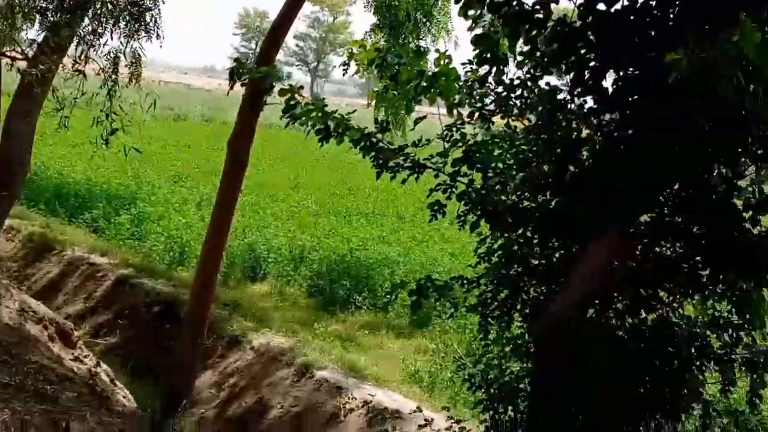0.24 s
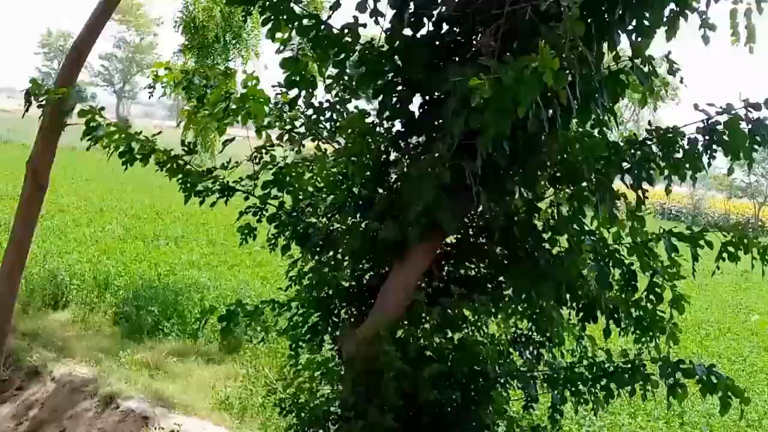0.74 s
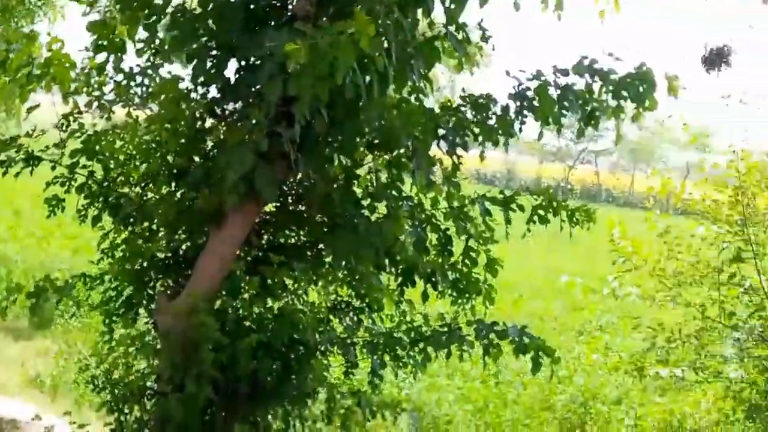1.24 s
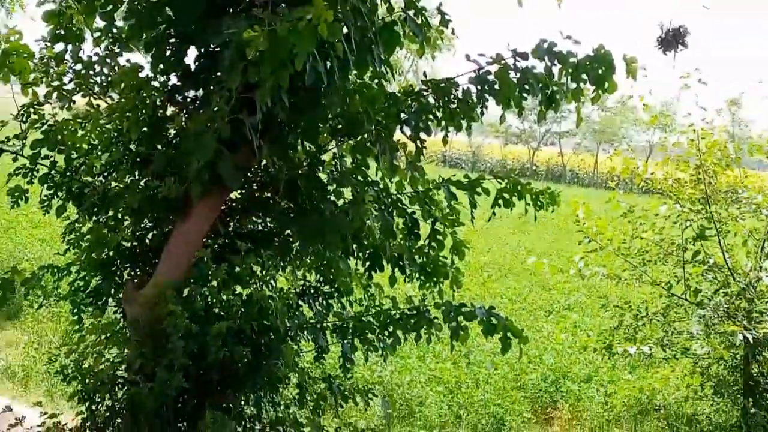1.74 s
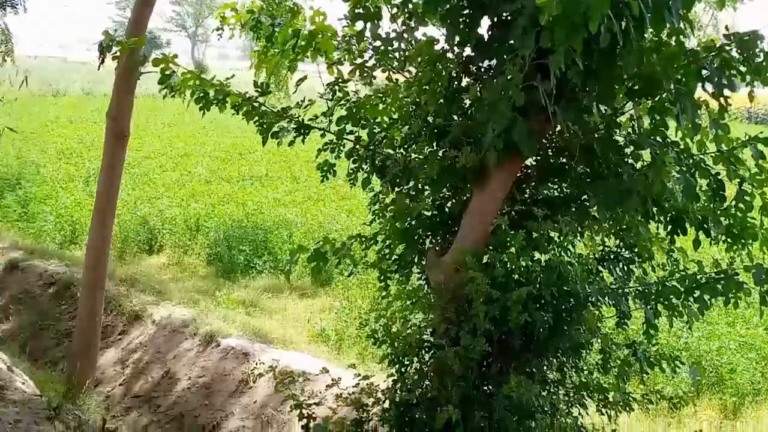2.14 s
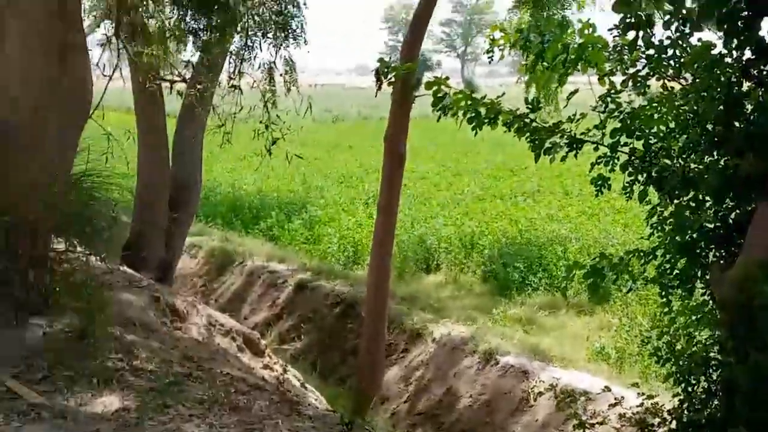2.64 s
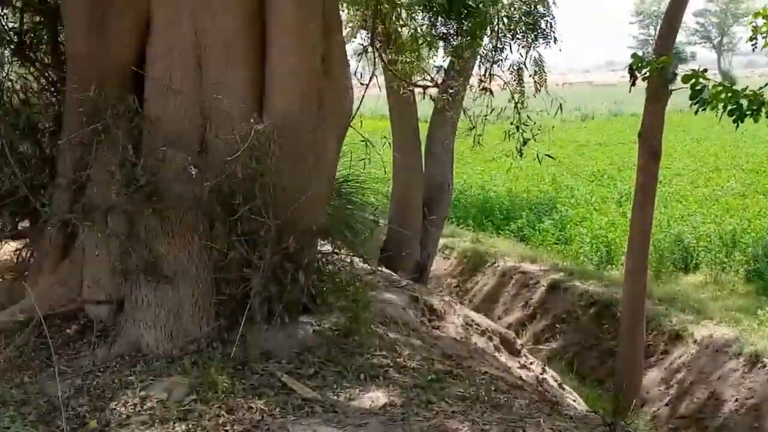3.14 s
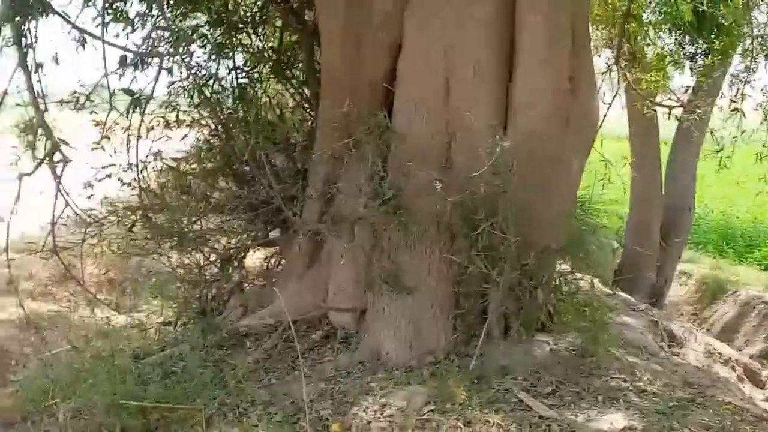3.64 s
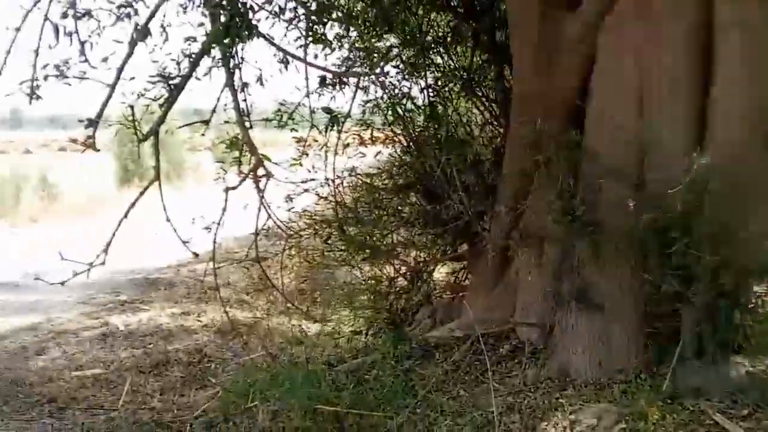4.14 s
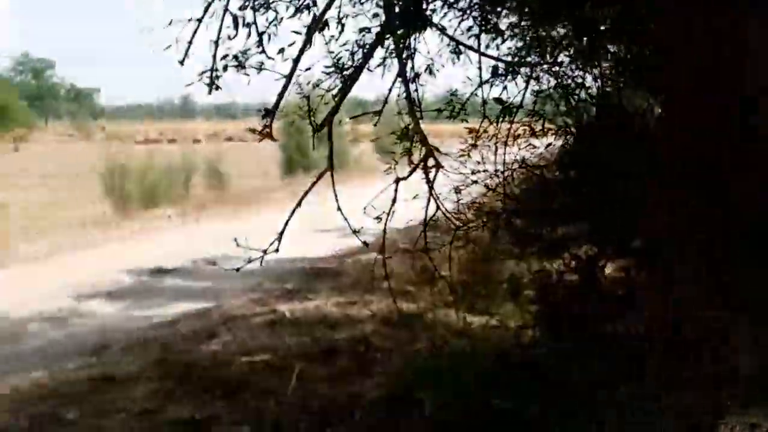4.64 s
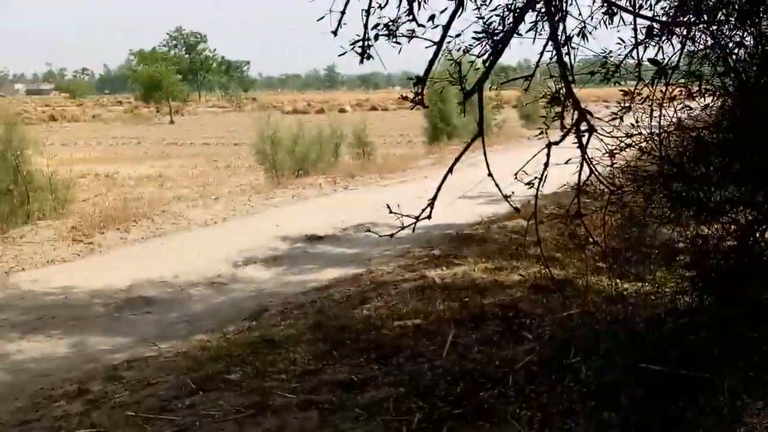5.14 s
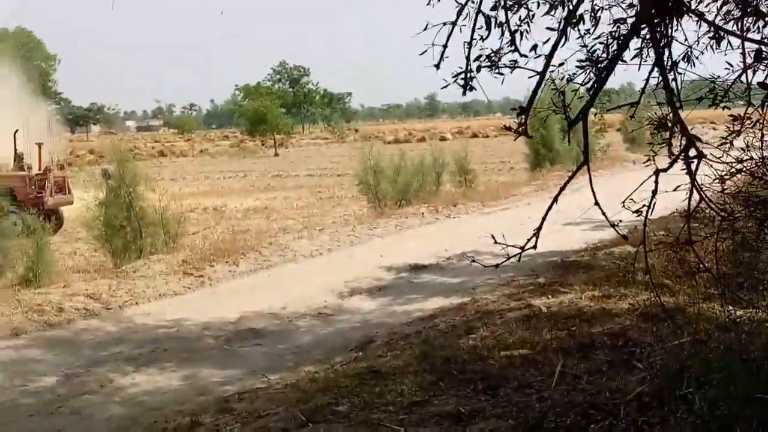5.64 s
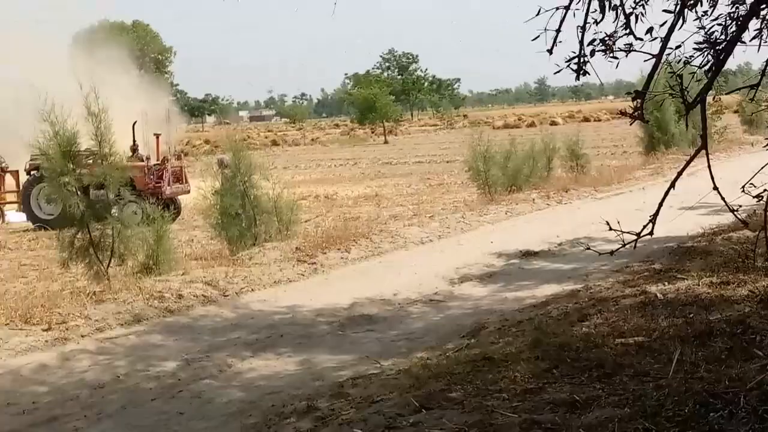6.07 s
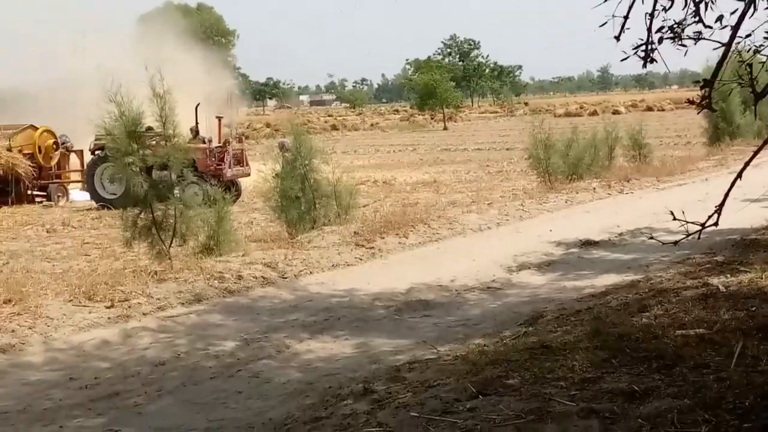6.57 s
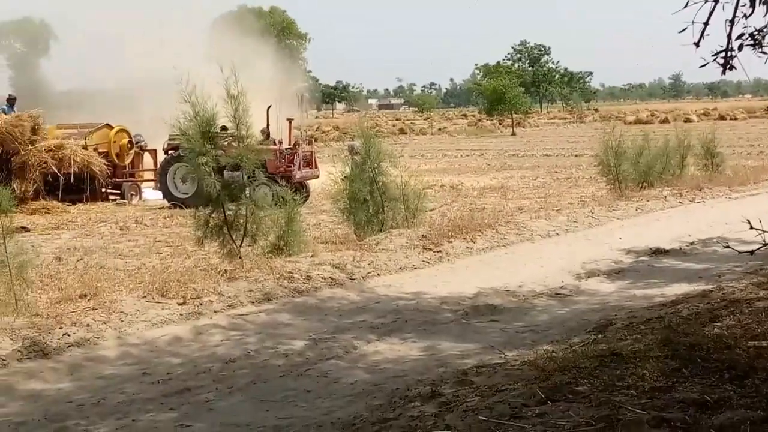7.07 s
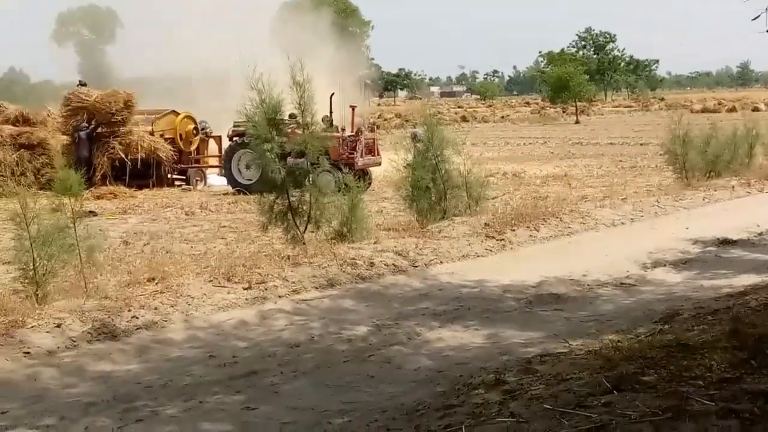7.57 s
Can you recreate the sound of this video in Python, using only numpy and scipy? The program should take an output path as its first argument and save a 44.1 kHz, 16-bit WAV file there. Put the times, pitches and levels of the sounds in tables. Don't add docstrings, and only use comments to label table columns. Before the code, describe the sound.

A tractor diesel drones steadily across an open field, knocking fast through the dry rushing hiss of a thresher, with small birds chirping early on.

```python
import sys
import numpy as np
from scipy import signal
from scipy.fft import rfft, irfft, next_fast_len
from scipy.io import wavfile
from scipy.ndimage import uniform_filter1d

SR = 44100
rng = np.random.default_rng(int(sys.argv[2]) if len(sys.argv) > 2 else 0)


def to_linear_factor(level_db):
    exponent = np.asarray(level_db, float) / 20
    return 10 ** exponent


def transcribe(signal):
    frames = np.atleast_2d(signal).T
    limited = np.clip(frames, -1, 1)
    pcm = np.round(limited * 32767).astype(np.int16)
    wavfile.write(sys.argv[1], SR, pcm)


N = 344421

# time_s, firing_hz
ENGINE_SPEED = [(0.0, 41.97), (0.77, 42.35), (1.57, 42.09), (1.71, 42.28), (1.93, 43.26), (2.43, 43.67),
                (2.64, 44.05), (3.32, 44.62), (3.78, 44.02), (4.18, 43.81), (4.52, 43.98), (5.73, 43.22),
                (6.69, 43.97), (6.9, 44.03), (7.2, 44.56), (7.5, 44.71), (7.81, 44.38)]
FREE_HZ, LOADED_HZ = 44.5, 42.2
# multiple of its rate, level_db running free, gain_db under full load
EXHAUST_TONES = [(1, -55.5, -1.5), (2, -36, -0.5), (3, -40, 5), (4, -58.5, 17), (5, -48.5, -9)]
BLOWER_TONES = [(2, -44.5, 6), (3, -48, 3.5), (4, -63, 12), (6, -47, -1.5)]
DRUM_TONES = [(1, -50.5, 4.5), (2, -44.5, -3), (3, -61, 5.5)]
GEAR_TONES = [(7, -59.5, -2.5), (17, -47, -4.5), (26, -60.5, 16.5), (42, -64, 9.5), (69.8, -66.5, 12),
              (78, -70.5, 12.5)]
PULLEY_TONES = [(1, -62, 14)]
# frequency_hz, level_db (per Hz)
RUMBLE_SPECTRUM = [(18, -46.5), (30, -19), (65, -9), (114, -2.5), (146, -3), (183, -8.5), (254, -5),
                   (352, -9.5), (417, -13), (563, -17), (707, -30.5), (803, -23.5), (900, -28.5),
                   (1170, -50.5), (1980, -120)]
# frequency_hz, level_db (per Hz)
RUSH_SPECTRUM = [(350, -25), (560, -8), (710, -17), (990, -9), (1250, -11), (1950, -6), (2350, .1),
                 (2750, -.1), (3200, -6), (4500, -7), (6200, -12), (7400, -21.5), (8300, -27), (10200, -36)]
# frequency_hz, side_minus_mid_db
STEREO_WIDTH = [(60, -17), (100, -38.5), (180, -48), (310, -32.5), (530, -15), (920, -14), (1600, -17.5),
                (2760, -18.5), (4760, -20), (8230, -2.5)]
# time_s, level_db
CLEARANCE = [(0, -35), (.7, -35), (1.1, -34.5), (1.7, -34), (1.95, -38.5), (2.4, -39), (3.1, -35.5),
             (4.0, -34.5), (4.8, -32), (5.15, -32.5), (5.8, -34), (6.5, -34), (7.0, -36), (7.35, -34.5),
             (7.81, -36)]
# frequency_hz, gain_db under full load,
# share of the clearance (plain number), gain_db over the whole turn of the phone
RUSH_BANDS = [(740, 4, -.3, -6), (1025, 3.5, 0.12, -5), (1413, 1, .6, -1.9), (2000, 5.6, -0.05, 6),
              (2547, -0.1, 1, 1.7), (3355, 5.5, 0.024, 0.5), (4340, -1.9, 0.71, -1.5), (5600, 0.3, 1, 3),
              (6980, -0.5, 0.22, -11), (8700, -4.5, -0.86, -14)]
# delay_ms, level_db
ECHOES = [(2.7, -16), (6.1, -15), (10.7, -15)]
# length_s, first_hz, middle_hz, last_hz, level_db
LOW_NOTE = (.048, 4560, 4660, 4710, -39)
HIGH_NOTE = (.045, 5800, 6550, 6050, -38.5)
# start_s, length_s, first_hz, last_hz, level_db
GLIDES = [(.92, .035, 4300, 3950, -46), (3.57, .03, 6600, 6650, -48), (3.655, .04, 4900, 3400, -44),
          (3.912, .04, 4450, 3200, -41), (4.078, .05, 3900, 6400, -41), (4.15, .05, 4600, 3400, -40),
          (4.345, .035, 4200, 3000, -39), (4.378, .03, 3000, 3750, -40), (4.765, .08, 3650, 4500, -39.5),
          (4.845, .08, 4500, 4600, -38.5), (4.91, .04, 4600, 3900, -43)]
# start_s, length_s, first_hz, last_hz, level_db
HOARSE_CHIRPS = [
    (2.80, .08, 5900, 4700, -40),
    (3.095, .065, 5550, 5000, -37),
    (3.105, .105, 5200, 4400, -39.5),
]


def curve(table):
    rows = np.array(table)
    return np.interp(np.arange(N) / SR, rows[:, 0], rows[:, 1])


def walk(rate_hz):
    hold = int(SR / rate_hz)
    levels = np.repeat(rng.standard_normal(N // hold + 1), hold)
    return 1.384 * uniform_filter1d(uniform_filter1d(levels, hold), hold)[:N]


def coloured(envelopes, spectrum, level_db):
    size = next_fast_len(N)
    octave = np.log2(np.arange(size // 2 + 1) * SR / size + 1)
    centres = np.log2(list(envelopes))

    def shape(table):
        hz, db = np.transpose(table)
        return to_linear_factor(np.interp(octave, np.log2(hz), db))

    pair = 0
    for k, envelope in enumerate(envelopes.values()):
        share = np.sqrt(np.interp(octave, centres, np.arange(len(centres)) == k))
        noise = envelope / np.sqrt(np.mean(envelope ** 2)) * rng.standard_normal((2, N))
        pair = pair + share * rfft(noise, size)
    pair = pair * shape(spectrum)
    pair[1] *= shape(STEREO_WIDTH) * to_linear_factor(-4.0)
    mid, side = irfft(pair, size)[:, :N]
    return to_linear_factor(level_db) / np.std(mid) * np.array([mid + side, mid - side])


def hum(turns, tones, load, waver_db):
    out = np.zeros(N)
    for multiple, db, load_db in tones:
        level = to_linear_factor(db + load_db * load + waver_db * walk(6))
        out += np.sqrt(2) * level * np.sin(2 * np.pi * np.round(multiple) * turns)
    return out


def machine_tones(firings, hz, load):
    slip_per_hz = .00242
    belt = np.cumsum(hz * (1 + slip_per_hz * (hz - LOADED_HZ))) / SR
    exhaust = hum(firings - .525, EXHAUST_TONES, load, waver_db=.6)
    blower = hum(1.02 * belt - .156, BLOWER_TONES, load, waver_db=.36)
    drum = hum(1.3009 * belt - .26, DRUM_TONES, load, waver_db=.5)
    gears = hum(firings / 3, GEAR_TONES, load, waver_db=1.0)
    pulley = hum(8.606 * belt + .255, PULLEY_TONES, load, waver_db=1.0)
    return exhaust + blower + drum + gears + pulley


def rumble():
    swell = to_linear_factor(.7 * walk(2.74))
    bands = {hz: swell * to_linear_factor(1.82 * walk(9)) for hz in (60, 150, 300, 600)}
    thin = signal.butter(4, 38, "high", fs=SR, output="sos")
    return signal.sosfilt(thin, coloured(bands, RUMBLE_SPECTRUM, level_db=-35))


def rush(firings, load, turn):
    chance = rng.standard_normal((int(firings[-1]) + 2, len(RUSH_BANDS) + 1))
    clear_db = curve(CLEARANCE)
    bands = {}
    for k, (hz, load_db, share, turn_db) in enumerate(RUSH_BANDS):
        level_db = load_db * load + share * clear_db + turn_db * turn + .64 * walk(1.937)
        late = np.interp(np.log(hz), np.log([700, 2000, 5600, 7300]), [.06, 0, 0, .09])
        cycle, place = np.divmod(firings - .255 - late + 1, 1)
        cycle = cycle.astype(int)
        burst = np.clip(place / .1, 0, 1) * np.exp(-np.clip(place - .22, 0, 1) / .07)
        ringing = .4 * np.exp(-place / .31)
        knock_db = np.array([-.4, -.7, 1.1])[cycle % 3]
        knock_db = knock_db + .6 * chance[cycle, -1] + 1.8 * chance[cycle, k]
        knock_db += 1.8 * load
        knock_db += np.interp(np.log(hz), np.log([700, 2600, 6000, 8000]), [3.5, 7, 4, -1])
        power = 1 + to_linear_factor(knock_db) ** 2 * (burst ** 2 + ringing)
        bands[hz] = np.sqrt(power / np.mean(power)) * to_linear_factor(level_db + .57 * walk(12))
    return coloured(bands, RUSH_SPECTRUM, level_db=-32.5)


def surroundings(sound):
    out, now = sound.copy(), np.arange(N)
    for delay_ms, db in ECHOES:
        lag = delay_ms * (1 + .052 * walk(.399)) * SR / 1000
        out += to_linear_factor(db) * np.array([np.interp(now - lag, now, channel) for channel in sound])
    return out


def song():
    first_s, every_s, wait_s = .117, .218, .051
    notes = []
    for k in range(4):
        start = first_s + every_s * k
        notes.append((start, *LOW_NOTE))
        notes.append((start + wait_s, *HIGH_NOTE[:4], HIGH_NOTE[4] - .6 * k ** 2))
    return notes


def arched(glides, arch):
    notes = []
    for start, length, first_hz, last_hz, db in glides:
        rise_hz = last_hz - first_hz
        middle_hz = (first_hz + last_hz) / 2 + arch * max(rise_hz, -.2 * rise_hz)
        notes.append((start, length, first_hz, middle_hz, last_hz, db))
    return notes


def birds(notes, hoarse):
    out = np.zeros(N)
    flutter = walk(400)
    for start, length, first_hz, middle_hz, last_hz, db in notes:
        u = np.linspace(0, 1, int(length * SR))
        i = int(start * SR)
        hz = np.interp(u, [0, .5, 1], [first_hz, middle_hz, last_hz])
        hz = uniform_filter1d(hz, len(u) // 4)
        hz = hz * (1 + .03 * hoarse * flutter[i:i + len(u)])
        swell = np.sin(np.pi * u) ** .5
        out[i:i + len(u)] += np.sqrt(2) * to_linear_factor(db) * swell * np.sin(2 * np.pi * np.cumsum(hz) / SR)
    age = np.arange(SR // 16)
    leaves = rng.standard_normal(len(age)) * np.exp(-age / (.016 * SR))
    tail = signal.fftconvolve(out, leaves / np.sqrt(np.sum(leaves ** 2)))[:N]
    return out * to_linear_factor(4 * hoarse * walk(150)) + to_linear_factor(-6) * tail


def scene():
    hz = curve(ENGINE_SPEED)
    firings = np.cumsum(hz) / SR
    load = np.clip((FREE_HZ - hz) / (FREE_HZ - LOADED_HZ), 0, 1)
    turn = np.arange(N) / N
    machine = surroundings(rush(firings, load, turn)) + rumble() + machine_tones(firings, hz, load)
    calls = birds(song() + arched(GLIDES, arch=.35), hoarse=.35)
    calls = calls + birds(arched(HOARSE_CHIRPS, arch=-.2), hoarse=.85)
    return machine * to_linear_factor(np.array([[-.35], [.35]])) + calls * to_linear_factor(np.array([[.1], [1.3]]))


def top_cut(x):
    return signal.sosfilt(signal.butter(12, 10100, fs=SR, output="sos"), x)


def record(dry):
    return top_cut(dry)


dry = scene()
out = record(dry)
transcribe(out)
```